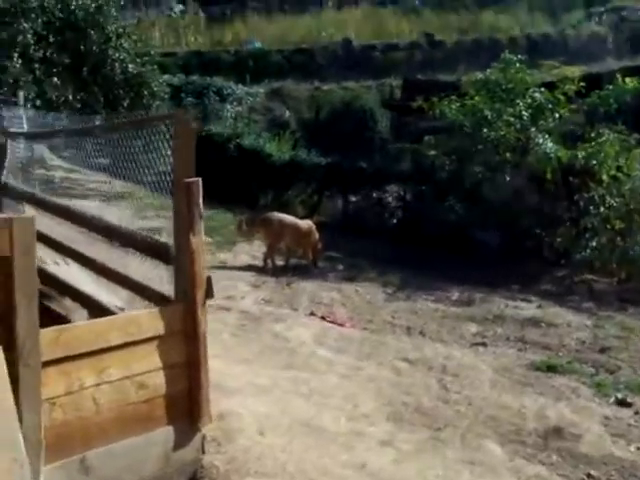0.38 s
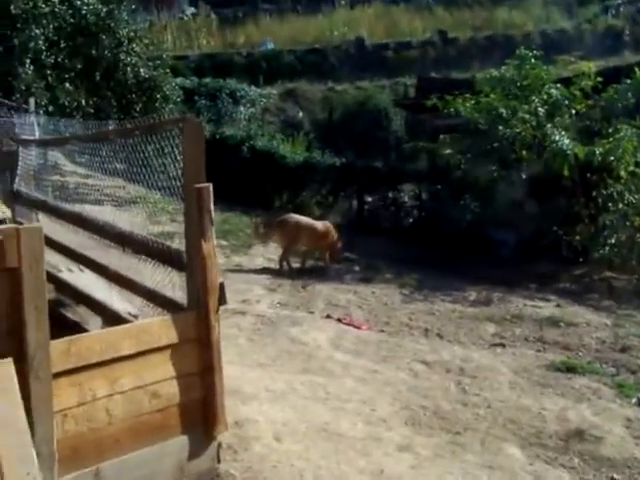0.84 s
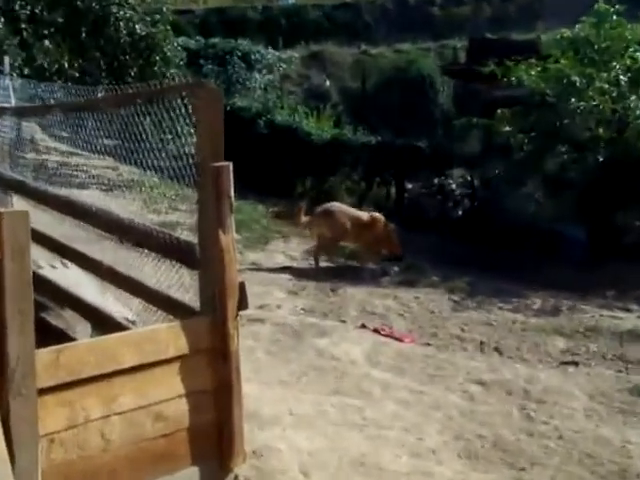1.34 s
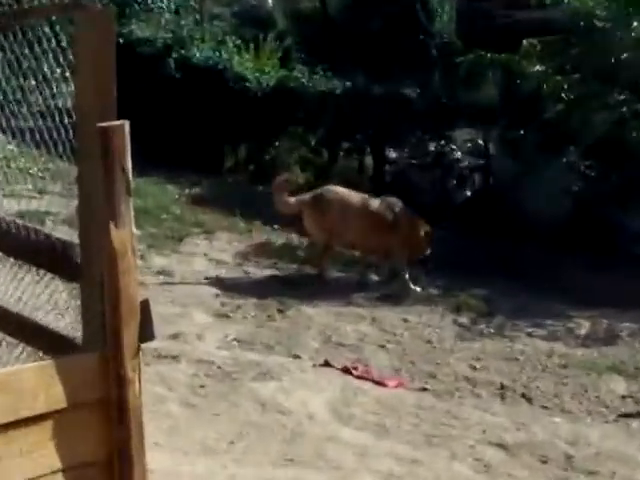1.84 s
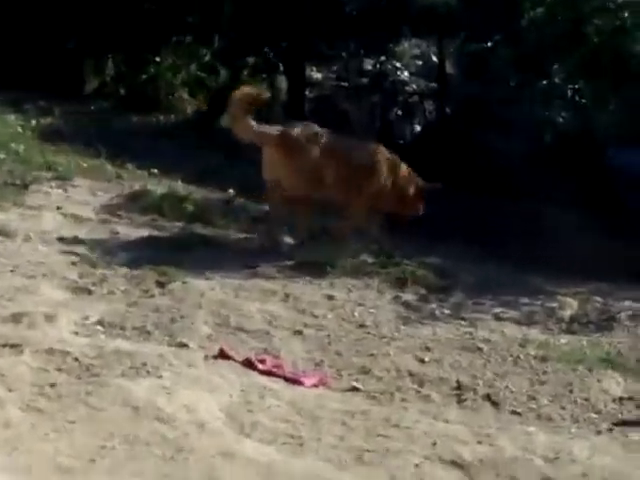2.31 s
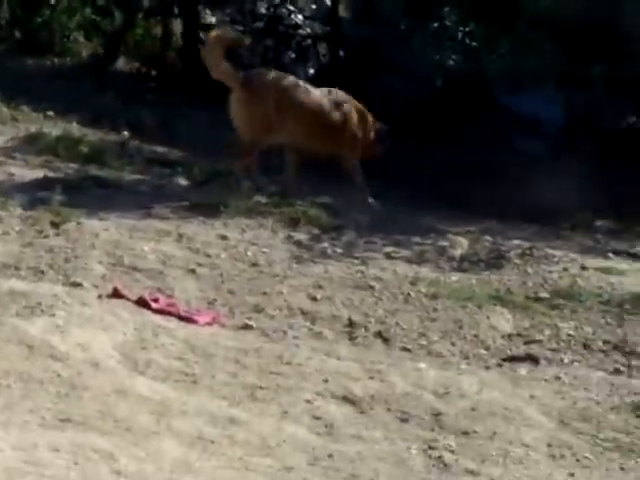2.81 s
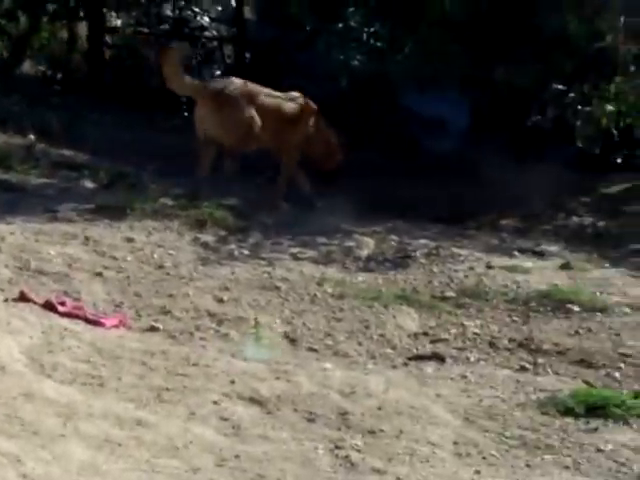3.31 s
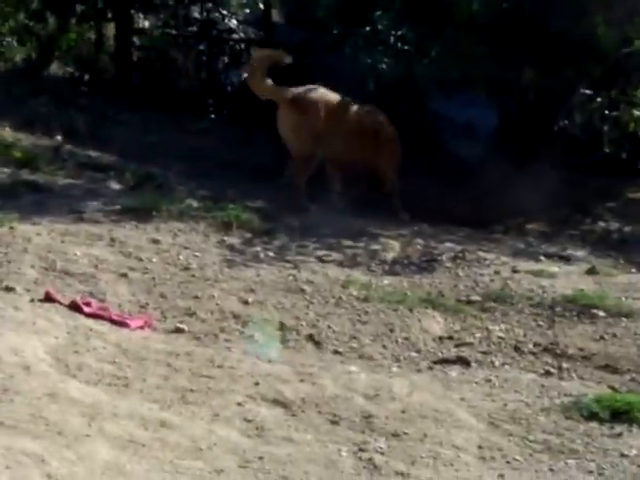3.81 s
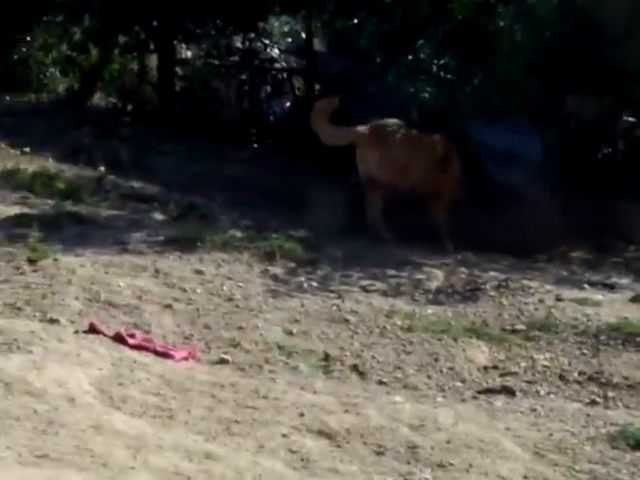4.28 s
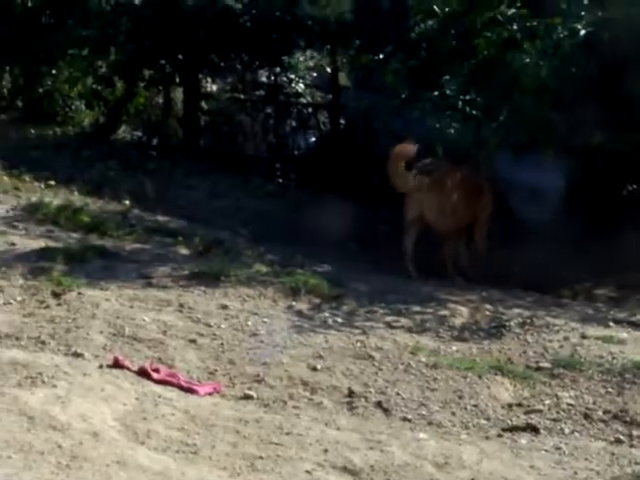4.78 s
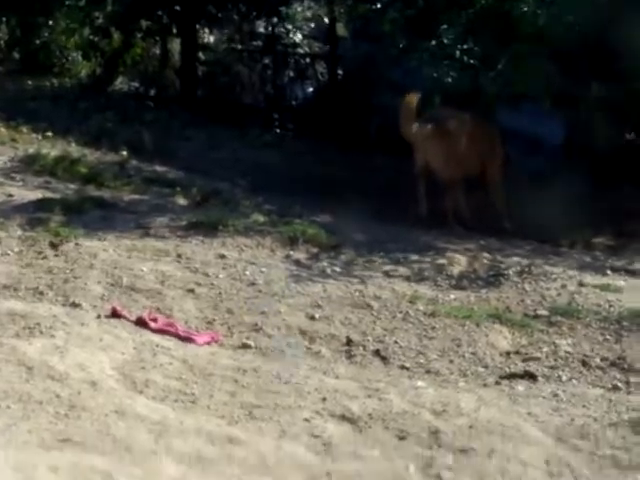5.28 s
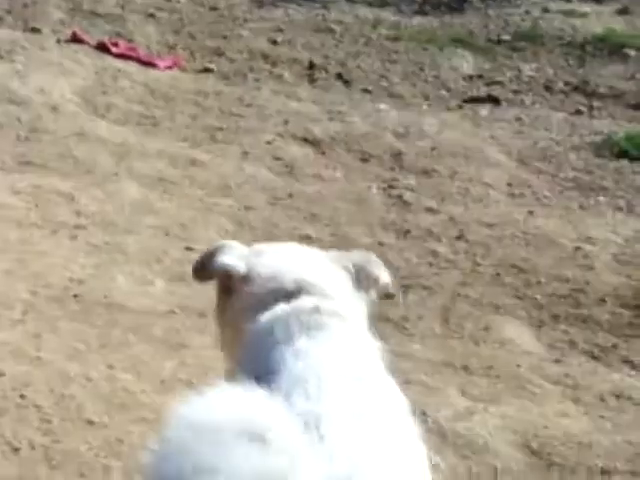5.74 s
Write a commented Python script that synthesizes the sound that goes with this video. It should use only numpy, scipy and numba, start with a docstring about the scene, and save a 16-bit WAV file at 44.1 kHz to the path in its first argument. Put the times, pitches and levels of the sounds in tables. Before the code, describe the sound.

A dog near the microphone whimpers again and again, short whistle-like nasal whines that slowly sink in pitch, with rough huffs between. Paws scuff dirt early on and small ticks click. Behind are airy outdoor hush, a faint far engine and a thin on-off buzz. Just after five seconds another dog gives two loud rasping barks that ring off wooden sheds. Handheld stereo camera pickup.

```python
"""A dog close by whimpers through its nose: near-pure tones whose overtones meet two nose resonances.
Between whimpers it huffs (noise in throat and nose), paws scuff the dirt (filtered grains) and small things tick.
Another dog barks twice, from clean to chaotic cords, near wooden sheds that ring on through crossed echo paths.
Behind them a far engine hums in low sine orders, a thin band of noise buzzes on and off, and outdoor hush
swells as shaped noise."""
import sys
import numpy as np
from scipy import signal
from scipy.fft import rfft, irfft
from scipy.io import wavfile
from scipy.ndimage import uniform_filter1d, minimum_filter1d
from numba import njit

SR = 44100
rng = np.random.default_rng(int(sys.argv[2]) if len(sys.argv) > 2 else 0)


def boost_factor(decibels):
    """Convert a level in decibels to a linear amplitude factor."""
    exponent = np.asarray(decibels, float) / 20
    return 10 ** exponent


def transcribe(signal):
    """Save signal, clipped to [-1, 1], as a 16-bit WAV file at the path in sys.argv[1]."""
    frames = np.atleast_2d(signal).T
    limited = np.clip(frames, -1, 1)
    pcm = np.round(limited * 32767).astype(np.int16)
    wavfile.write(sys.argv[1], SR, pcm)


N = 259308  # samples
T = np.arange(N) / SR  # time [s]
PORT_GAP_S = 0.00023  # travel time of sound between the two microphones

# Table levels are settings: fixed trims and random flutter come on top in the functions.
# Whimpers, each as nose settings and a held note:
# (lower nose resonance [dB], upper nose resonance [dB], closing break [dB]), (time [s], pitch [Hz], effort [dB])
WHIMPER_NOTES = [ ((-54, -67, -50.5), [(0.0, 1265, -35.5), (0.064, 1261, -39.5), (0.098, 1188, -47)]),
                 ((-41, -56, -42), [(0.276, 1282, -43.5), (0.312, 1423, -25), (0.358, 1357, -36.5),
                 (0.406, 1238, -37), (0.425, 1170, -41.5)]), ((-51.5, -52, -49), [(0.612, 1175, -39),
                 (0.635, 1215, -44.5), (0.66, 1225, -39), (0.7, 1140, -44), (0.766, 1094, -53),
                 (0.926, 1088, -54.5), (1.008, 1143, -49), (1.048, 1160, -39), (1.06, 1152, -50)]),
                 ((-44.5, -53.5, -43), [(1.248, 1090, -51.5), (1.346, 1132, -35.5), (1.382, 1085, -43.5)]),
                 ((-41.5, -48, -54), [(1.59, 1076, -42), (1.61, 1090, -41.5), (1.71, 1120, -37.5),
                 (1.732, 1062, -42)]), ((-49, -46.5, -55), [(1.915, 1033, -47.5), (1.946, 1086, -38),
                 (2.018, 1036, -42.5), (2.044, 1040, -42)]), ((-54.5, -50, -45), [(3.07, 983, -56),
                 (3.1, 1064, -41), (3.202, 1102, -42.5)]), ((-47, -52.5, -49), [(3.385, 1136, -41),
                 (3.406, 1219, -36.5), (3.464, 1225, -37), (3.495, 1130, -44.5), (3.512, 985, -42.5)]),
                 ((-51.5, -47.5, -40.5), [(3.685, 1047, -44.5), (3.718, 1077, -36), (3.802, 1042, -38),
                 (3.84, 1001, -51)]), ((-45, -48, -35), [(4.012, 870, -48), (4.04, 907, -49.5),
                 (4.074, 984, -49), (4.222, 1014, -42.5)]), ((-46, -44.5, -39), [(4.454, 898, -45.5),
                 (4.488, 1010, -49), (4.538, 999, -43.5), (4.624, 1040, -39.5)]), ((-62, -64, -62.5),
                 [(4.3, 900, -61), (4.35, 927, -64), (4.39, 905, -66)]), ((-61, -64, -57.5),
                 [(4.735, 690, -53.5), (4.76, 751, -49.5), (4.785, 801, -50)]), ((-47, -49.5, -37),
                 [(4.84, 918, -43), (4.872, 979, -52), (4.948, 947, -47.5)]), ((-44.5, -68, -61.5),
                 [(5.125, 1070, -60.5), (5.15, 1047, -53)]), ]
# Nose resonances, for overtones and air: (frequency [Hz], level [dB])
NOSE_COLOUR = [(1900, 0), (2600, -18.5), (3000, -10), (3400, -13), (3900, 2.5), (4400, 1.5), (5200, -2),
               (5800, -7), (6600, -9), (7600, -26.5)]
# Hoarse breaths: (start [s], length [s], level [dB], throat resonance [Hz], nose hiss [dB])
HUFF_BREATHS = [(0.03, 0.069, -49.5, 710, -64), (0.1, 0.18, -46.5, 1480, -65),
                (0.225, 0.066, -47, 577, -53.5), (0.68, 0.027, -44, 734, -50),
                (2.035, 0.057, -43.5, 805, -43), (2.21, 0.14, -44.5, 745, -48),
                (2.385, 0.055, -52, 855, -52), (2.45, .07, -54, 686, -68), (2.57, 0.087, -45, 640, -49.5),
                (2.74, .07, -53, 790, -68), (2.8, .16, -45, 833, -52.5), (3.53, 0.04, -47, 780.5, -62),
                (3.855, 0.053, -45.5, 792, -60), (4.36, 0.1, -49.5, 830, -59),
                (4.67, .07, -45.5, 692, -56.5), (4.83, 0.13, -49.5, 768, -73),
                (5.04, 0.094, -52.5, 622, -67.5)]
# Fixed resonances, two of the throat, then three for the nose hiss: (frequency [Hz], width [Hz], level [dB])
UPPER_AIRWAY = [(1120, 330, -7.5), (1820, 330, -4), (3900, 360, -8), (4630, 520, -10), (5460, 1200, -14.5)]
# Two barks; jaw opening sets the overtones and rasp: (time [s], effort [dB], jaw opening [dB])
BARK_STROKES = [
    [(5.13, -40.5, -13), (5.145, -16, -7.5), (5.16, -10, 1), (5.18, -18, 8), (5.21, -10, 4),
     (5.24, -21.5, 14), (5.275, -20, -9.5), (5.31, -39, -7.5)],
    [(5.33, -41, -11.5), (5.36, -23, 5.5), (5.385, -13, 0), (5.415, -12.5, 3.5), (5.44, -10.5, -1),
     (5.47, -19, 3), (5.505, -30.5, -4), (5.54, -51, 3.5)],
]
# Resonances of the open jaws: (frequency [Hz], width [Hz], level [dB])
JAW_RESONANCES = [(581, 121, 6), (889, 58.4, 3.5), (1025, 81, 2.5), (2010, 430, -4), (2670, 360, -9),
                  (4000, 1000, -22), (5600, 1700, -28.5)]
# Echo paths between the shed walls: (delay [ms])
SHED_ECHO_MS = [17.3, 21.1, 25.9, 30.7, 36.1, 41.9, 54, 51]
# Scattering by the planks: (delay [ms])
PLANK_SCATTER_MS = [3.1, 5.3, 8.9, 11]
# Paws in the dirt: (start [s], length [s], grit [dB], thud [dB], clods [dB])
PAW_SCUFFS = [(0.1, 0.17, -58, -53.5, -55), (0.455, 0.063, -33.5, -52, -37), (0.47, 0.12, -28, -45.5, -31),
              (0.97, .11, -64, -46.5, -56), (1.36, 0.072, -60, -58, -63), (1.46, .07, -44, -56, -61),
              (2.39, 0.079, -49.5, -56, -60), (2.45, 0.08, -67, -49, -47), (5.585, 0.063, -39.5, -51, -55)]
# Spectrum of the grit: (frequency [Hz], density [dB per Hz])
GRIT_COLOUR = [(180, -50), (300, -19), (553, -24), (718, -22), (830, -9), (1770, -10), (1900, -14),
               (4900, -5), (9700, -46.5), (12600, -83), (21300, -120)]
# Small ticks: (time [s], level [dB], ring pitch [Hz], dull knock [dB], left minus right [dB])
SMALL_TICKS = [(0.2184, -37.5, 2920, -49, 10), (0.269, -38, 3750, -47, -1), (0.469, -36.5, 4320, -60, -11),
               (0.5132, -27, 3100, -23, -10), (0.5411, -36, 2607, -40.5, -14),
               (0.5667, -33, 2670, -33, 0.5), (0.9567, -37.5, 3020, -42, 25.5), (1.069, -39, 4140, -60, 2),
               (1.1817, -48, 3000, -40.5, 30), (1.3956, -44, 4470, -57, -3), (1.487, -41.5, 3130, -44, 17),
               (2.044, -24.5, 2130, -60, 7), (2.4305, -39.5, 1886, -65, -11),
               (4.3318, -38.5, 2390, -68, -3.5)]
# Far engine: (time [s], firing rate [Hz], level [dB])
ENGINE_RUN = [(0.0, 56.3, -54.5), (0.6, 53, -75.5), (1.4, 54.5, -58), (2.2, 53.7, -61), (2.45, 52.5, -58.5),
              (3.3, 54.3, -60), (3.95, 54.8, -57.5), (4.86, 57, -65), (5.7, 58.3, -56), (5.88, 58.1, -60)]
# Spells in which the engine's higher orders carry: (start [s], length [s], second order [dB], fourth order [dB])
ENGINE_DRONES = [(1.0, 1.5, -68, -58), (2.7, 1.5, -58, -83), (4.5, 1, -59, -70.5), (5.3, .8, -54, -55.5)]
# Thin buzz: (start [s], length [s], level [dB])
BUZZ_SPELLS = [(0.0, 0.65, -58.5), (0.52, 0.26, -55), (1.2, 1, -53.5), (3.45, .75, -56.5),
               (4.3, 0.51, -56.5)]
# Spectrum of the outdoor bed: (frequency [Hz], density [dB per Hz])
HUSH_COLOUR = [(12, -40), (20, -1.5), (122, 3), (234, -4), (303, -12.5), (521, -1), (641, -2.5),
               (945, -3.5), (1050, -3.5), (1130, -4), (1630, -7), (2870, -8), (3190, -9), (6930, -17.5),
               (9700, -25.5), (12600, -63), (21300, -120)]
# Swell of the bed above 300 Hz: (time [s], level [dB])
TREBLE_SWELL = [(0, 4), (.5, 2), (1.9, 5), (2.8, 1), (4.4, 3), (5.05, 3.5), (5.4, 12), (5.88, 5)]
# Swell of the bed below 300 Hz: (time [s], level [dB])
BASS_SWELL = [(0, 3.5), (.3, -20.5), (.7, -0.5), (2.1, 0), (3.8, -2), (5.4, 0), (5.65, 13), (5.88, 10)]
# Shading by the camera body: (frequency [Hz], left minus right [dB])
BODY_SHADING = [(60, -8), (110, 2.5), (180, 0), (320, 2), (560, 0.5), (990, 1.5), (1730, 1), (3020, 4.5),
                (5280, -5), (9250, -3)]


def whimpers():
    """A near-pure tone; only the overtones that meet the two nose resonances come through."""
    gate, (hz, db, low_db, high_db) = play([phrase(*w) for w in WHIMPER_NOTES])
    # where the pitch tumbles the voice breaks: the cords lose their regular beat
    tumble = np.abs(np.gradient(np.log(hz)) * SR)
    breaking = uniform_filter1d((tumble / 7.0 - .3).clip(0, 1), size=500)
    jitter = .005 * walk(40) + (.005 + .07 * breaking) * walk(300)
    phase = 2 * np.pi * np.cumsum(hz * (1 + jitter)) / SR
    tone = boost_factor(db + 4.5 + 2.4 * walk(86)) * np.sin(phase)
    overtones = 0
    for k in range(2, 8):
        # crossfade from the lower to the upper nose resonance
        upper = ((k * hz - 4450) / 500).clip(0, 1)
        nose_db = low_db + upper * (high_db - low_db) + colour_db(k * hz, NOSE_COLOUR)
        overtones = overtones + boost_factor(nose_db + 5.2 * walk(48)) * np.sin(k * phase + k)
    air = (0.41 + .5 * breaking) * boost_factor(np.maximum(low_db, high_db)) * noise(NOSE_COLOUR)
    steady_overtones = (1 - 1.5 * breaking).clip(0) * overtones
    return np.sqrt(2) * gate * tone, gate * (steady_overtones + air)


def phrase(nose, note):
    """Slides one whimper into its held note, drops it to a lower register and lets it die: rows for play().

    Each row is (time [s], pitch [Hz], effort [dB], lower nose [dB], upper nose [dB])."""
    onset_s, onset_pitch, onset_db = .018, 0.98, -6.5  # pitches are ratios to the held note
    break_s, break_pitch, break_nose_db = .009, .84, -4
    tail_s, tail_db = .03, -15
    nose_follows, nose_opens_db = 0.36, 6  # overtone dB per dB of effort; gain over the held note
    (low_db, high_db, break_db), (s0, hz0, db0), (s1, hz1, _) = nose, note[0], note[-1]
    low_hz = hz1 * break_pitch
    rows = np.array([(s0 - onset_s, hz0 * onset_pitch, db0 + onset_db),
                     *note,
                     (s1 + break_s, low_hz, break_db),
                     (s1 + break_s + tail_s, low_hz, break_db + tail_db)])
    lift = nose_follows * (rows[:, 2] - rows[:, 2].max())
    lift += nose_opens_db * (((rows[:, 0] - s0) / (s1 - s0)).clip(-.5, 1) - 1)
    lift[[0, -2, -1]] += [onset_db, break_nose_db, tail_db]
    return np.c_[rows, low_db + lift, high_db + lift].tolist()


def huffs():
    """Air rasps past slack cords: half-voiced noise in the throat, a hiss in the nose."""
    shape, (db, throat_hz, nose_db) = spells(HUFF_BREATHS, rise=0.22, fall=0.41)
    hz = throat_hz[shape.argmax(axis=0)]  # the strongest breath sets the throat
    air = rng.standard_normal(N) * boost_factor(2.0 * walk(56))
    half_voiced = boost_factor(5.0) * svf(air, hz, 60.)
    breathy = svf(svf(air, hz, 250.), hz, 350.)
    throat = half_voiced + breathy + 1.1 * ring(air, UPPER_AIRWAY[:2])
    hiss = ring(air, UPPER_AIRWAY[2:])
    return boost_factor(db + 15.0) @ shape * throat + boost_factor(nose_db + 17.5) @ shape * hiss


def barks():
    """Cords that start clean and turn chaotic, through open jaws."""
    bark_hz, slack_db, sag_hz_per_db = 573, -22, 2  # the pitch holds until effort falls under slack_db
    clean_until_s, turns_rough_s, roughness = 5.148, 0.031, 0.41
    gate, (db, upper_db) = play(BARK_STROKES)
    hz = bark_hz - sag_hz_per_db * (slack_db - db).clip(0)
    rough = roughness * ((T - clean_until_s) / turns_rough_s).clip(0, 1)
    steady = 2 * np.pi * np.cumsum(hz * (1 + .03 * rough * walk(80))) / SR
    phase = steady + 2 * np.pi * np.cumsum(hz * 0.0976 * rough * walk(202.7)) / SR
    upper = sum(np.cos(k * phase) * boost_factor(-8.0 * (k > 2)) for k in range(2, 12))
    # loose tissue flaps some fifty times a second and makes the lowest partial throb
    flap_phase = 2 * np.pi * np.cumsum(53. * (1 + .12 * walk(30))) / SR
    flap = 1 + np.minimum(2.5 * rough, .95) * np.cos(flap_phase)
    rasp = 6.06 * rng.standard_normal(N) * (1 + 0.83 * np.cos(phase)) * boost_factor(2.0 * walk(66))
    cords = flap * np.cos(steady) + boost_factor(upper_db) * ((1 - rough) * upper + rough * rasp)
    thin_lows = signal.butter(4, 400, "high", fs=SR, output="sos")
    mouth = signal.sosfilt(thin_lows, ring(cords, JAW_RESONANCES))
    return gate * boost_factor(db - 3.0) * mouth


def sheds(x, t60_s, damp, db):
    """Planks scatter the sound, then it echoes between the wooden walls; t60_s is before damping."""
    delays_s = np.array(PLANK_SCATTER_MS)[:, None] / 1000
    z = np.exp(-2j * np.pi * np.fft.rfftfreq(N, 1 / SR) * delays_s)
    scattered = irfft(rfft(x) * np.prod((z - .6) / (1 - 0.5 * z), axis=0), N)
    lags = (np.array(SHED_ECHO_MS) * SR / 1000).astype(np.int64)
    gain = boost_factor(-60 * lags / SR / t60_s)
    # the tiny offset keeps the feedback out of denormal numbers
    return boost_factor(db) * diffuse(*walls(scattered + 1e-18, lags, gain, damp))


@njit
def walls(x, lags, gain, damp):
    """Eight echo paths that feed each other, duller on every round."""
    line, soft, out = np.zeros((8, 4096)), np.zeros(8), np.zeros((2, len(x)))
    for i in range(len(x)):
        total = 0.
        for k in range(8):
            soft[k] += (1 - damp) * (gain[k] * line[k, (i - lags[k]) & 4095] - soft[k])
            total += soft[k]
            out[k % 2, i] += soft[k]
        for k in range(8):
            line[k, i & 4095] = x[i] + soft[k] - total / 4
    return out


def scuffs():
    """Uneven grains of grit over crunching clods and a soft thud."""
    shape, levels = spells(PAW_SCUFFS, rise=0.33, fall=.45)
    grit_gain, thud_gain, clod_gain = boost_factor(np.array(levels)) @ shape
    grains = boost_factor(2.8 * walk(300) - 1.2)
    clods = noise([(300, -24), (480, 6), (620, -0.5), (1000, 0), (1500, -11.0)])
    thud = noise([(90, -28), (140, 10.0), (260, 11.5), (340, -35.5)])
    return grains * (grit_gain * noise(GRIT_COLOUR) + clod_gain * clods) + thud_gain * thud


def ticks():
    """Each a few bright cycles with a noisy edge, over a dull knock."""
    out, t = np.zeros((2, N)), np.arange(900) / SR
    for s, db, hz, knock_db, pan_db in SMALL_TICKS:
        edge = rng.standard_normal(900) * np.exp(-t / 0.0018)
        partials = np.sin(2 * np.pi * hz * t) + 0.81 * np.sin(2 * np.pi * 1.393 * hz * t)
        body = partials * np.exp(-t * hz / 4.2)  # dies over about four cycles
        knock = np.sin(2 * np.pi * 750 * t) * np.exp(-t / 0.0027)
        bright_gain = boost_factor(db + np.array([[.5], [-.5]]) * pan_db)
        i = int(s * SR)
        out[:, i:i + 900] += bright_gain * (body + .5 * edge) + boost_factor(knock_db + 5) * knock
    return out


def engine():
    """Low orders of a distant motor, wavering in the air."""
    gate, (hz, db) = play([ENGINE_RUN])
    shape, levels = spells(ENGINE_DRONES, rise=0.26, fall=0.46)
    phase = 2 * np.pi * np.cumsum(hz) / SR
    gains = [boost_factor(db), *(boost_factor(np.array(levels)) @ shape)]
    return sum(np.sqrt(2) * gain * boost_factor(2.0 * walk(6)) * np.sin(order * phase)
               for order, gain in zip((1, 2, 4), gains))


def buzz():
    """A narrow band of noise that throbs quickly."""
    shape, (db,) = spells(BUZZ_SPELLS, rise=0.2, fall=0.39)
    band = [(1750, -21), (1850, 0.5), (2000, -1.0), (2120, -22.5)]
    return boost_factor(db) @ shape * boost_factor(1.2 * walk(100)) * np.array([noise(band), noise(band)])


def hush():
    """Leaves, air and distance: a wide bed, partly from the right, whose bass and treble swell apart."""
    bed_db = -50
    high_db, low_db = (np.interp(T, *np.array(c).T) for c in (TREBLE_SWELL, BASS_SWELL))
    bed = diffuse(noise(HUSH_COLOUR), noise(HUSH_COLOUR)) + 0.26 * ports(noise(HUSH_COLOUR), 1.0)
    low = signal.sosfilt(signal.butter(2, 300, fs=SR, output="sos"), bed)
    bass = boost_factor(low_db + 1.3 * walk(4)) * low
    treble = boost_factor(high_db + 1.0 * walk(57)) * (bed - low)
    return boost_factor(bed_db) * (bass + treble)


def play(tables):
    """Columns of several (time [s], ..) tables as curves, and a gate open while a table lasts."""
    rows = np.concatenate(sorted(tables))
    gate = sum((T >= t[0][0]) & (T < t[-1][0]) for t in tables).clip(0, 1)
    return uniform_filter1d(1. * gate, size=300), [np.interp(T, rows[:, 0], c) for c in rows[:, 1:].T]


def spells(rows, rise, fall):
    """Each row (start, length, ..) swells, holds and fades by shares of its length: envelopes, other columns."""
    start, length, *cols = np.array(rows).T
    along = (T - start[:, None]) / length[:, None]
    return ((along / rise).clip(0, 1) * ((1 - along) / fall).clip(0, 1)) ** 2, cols


def colour_db(hz, points):
    """Reads a (frequency [Hz], level [dB]) spectrum along log frequency; -90 dB outside it."""
    p = np.array(points)
    return np.interp(np.log(np.maximum(hz, 1)), np.log(p[:, 0]), p[:, 1], left=-90, right=-90)


def noise(points):
    """Noise of rms 1 with a given spectrum."""
    x = irfft(rfft(rng.standard_normal(N)) * boost_factor(colour_db(np.fft.rfftfreq(N, 1 / SR), points)), N)
    return x / x.std()


def walk(rate):
    """Random drift of spread 1, smoothed twice over 1/rate seconds."""
    k = max(int(SR / rate), 2)
    w = uniform_filter1d(uniform_filter1d(rng.standard_normal(N), k), k)
    return w / w.std()


@njit
def svf(x, hz, width):
    """Band-pass with a moving centre, gain 1 there."""
    y, band, low = np.empty(len(x)), 0., 0.
    for i in range(len(x)):
        g, k = np.tan(np.pi * hz[i] / SR), width / hz[i]
        v = (band + g * (x[i] - low)) / (1 + g * (g + k))
        band, low, y[i] = 2 * v - band, low + 2 * g * v, k * v
    return y


def ring(x, modes):
    """Fixed resonances (frequency [Hz], width [Hz], level [dB]) in parallel, alternating in sign."""
    return sum((-1) ** k * boost_factor(db) * signal.lfilter(*signal.iirpeak(hz, hz / width, SR), x)
               for k, (hz, width, db) in enumerate(modes))


def ports(x, side, pan_db=0):
    """Two microphones a hand apart: side +1 (from the right) reaches the left one later."""
    turn = np.exp(-1j * np.pi * np.fft.rfftfreq(N, 1 / SR) * side * PORT_GAP_S)
    pair = irfft(rfft(x) * np.array([turn, turn.conj()]), N)
    return pair * boost_factor(np.array([[.5], [-.5]]) * pan_db)


def diffuse(a, b):
    """Sound from all round: alike on both microphones in the bass, unrelated once a wave fits the gap."""
    alike = .8 * np.sinc(2 * np.fft.rfftfreq(N, 1 / SR) * PORT_GAP_S)
    mid = rfft(a) * np.sqrt((1 + alike) / 2)
    side = rfft(b) * np.sqrt((1 - alike) / 2)
    return irfft(np.array([mid + side, mid - side]), N)


def scene():
    """Both dogs are on the right; the barking one is closer to the walls."""
    tone, over = whimpers()
    breath, paws, bark = huffs(), scuffs(), barks()
    near = ports(tone + breath + over, 0.9, pan_db=-0.8) + ports(paws, 0.48, pan_db=2.5)
    to_walls = bark + boost_factor(-15.5) * (tone + over + breath + paws)
    echoes = sheds(to_walls, t60_s=0.88, damp=0.7, db=-9)
    return near + ports(bark, 0.54, pan_db=2.0) + echoes + ticks() + engine() + buzz() + hush()


def band_limit(x):
    """A steep low-pass at the top of the band."""
    return signal.sosfilt(signal.butter(12, 9850, fs=SR, output="sos"), x)


def record(dry):
    """A limiter holds the loudest peaks; the camera body shades each microphone, and the treble dips near 8 kHz
    and ends near 10 kHz."""
    top = [(1, -9), (7200, 1.5), (7900, -13.5), (8400, -7.0), (9400, -11.5), (9900, -40)]  # (Hz, dB)
    highest = -minimum_filter1d(-np.abs(dry).max(axis=0), size=300)
    peak = uniform_filter1d(highest, size=300)
    held = dry * np.minimum(1, .9 / (peak + 1e-9))
    hz = np.fft.rfftfreq(N, 1 / SR)
    shade_hz, shade = np.array(BODY_SHADING).T
    shade_db = np.interp(np.log(hz + 1), np.log(shade_hz), shade)
    response_db = colour_db(hz, top) + np.array([[.5], [-.5]]) * shade_db
    mix = irfft(rfft(held) * boost_factor(response_db), N)
    return band_limit(mix)


dry = scene()
out = record(dry)
transcribe(out)
```